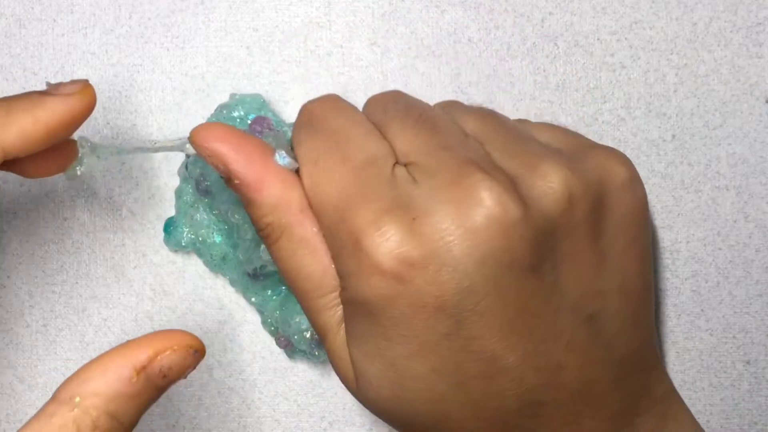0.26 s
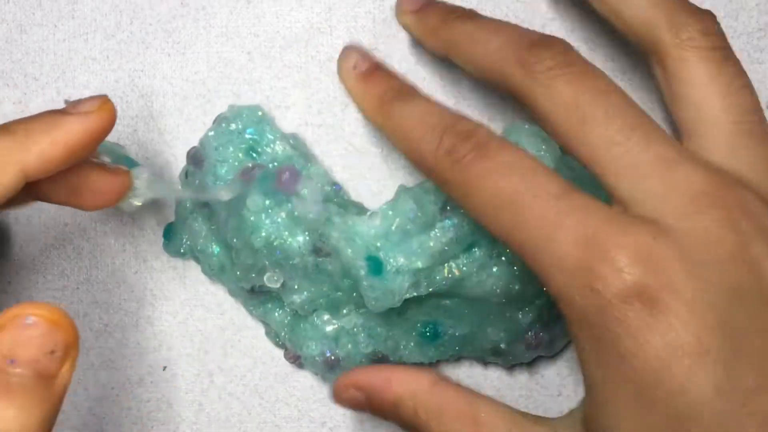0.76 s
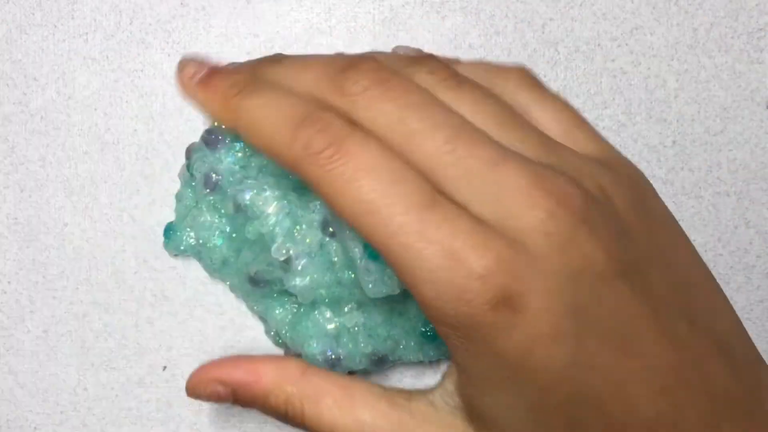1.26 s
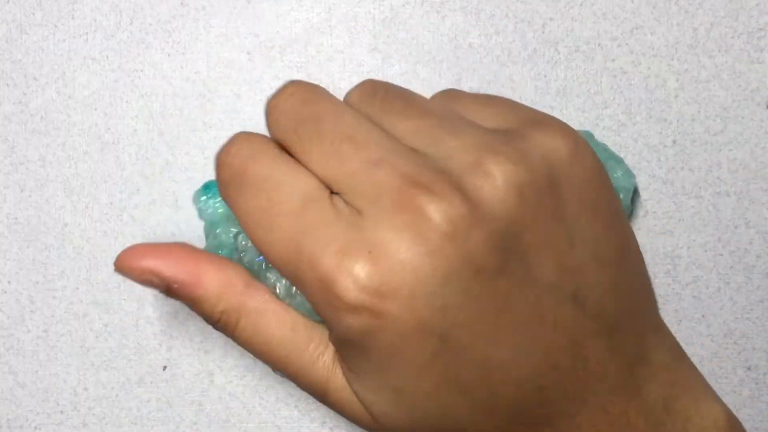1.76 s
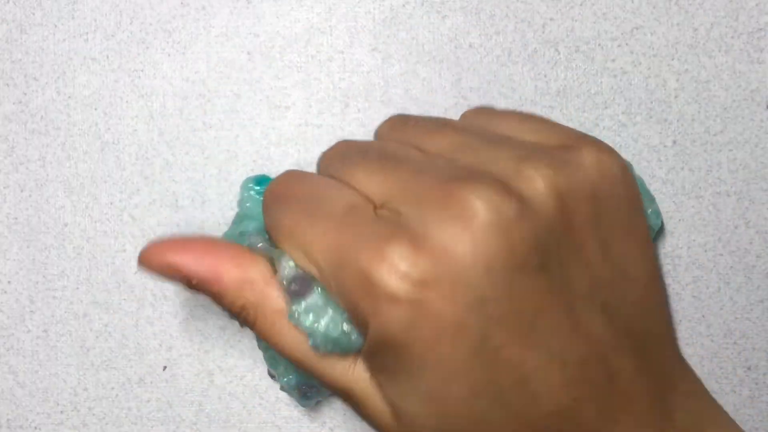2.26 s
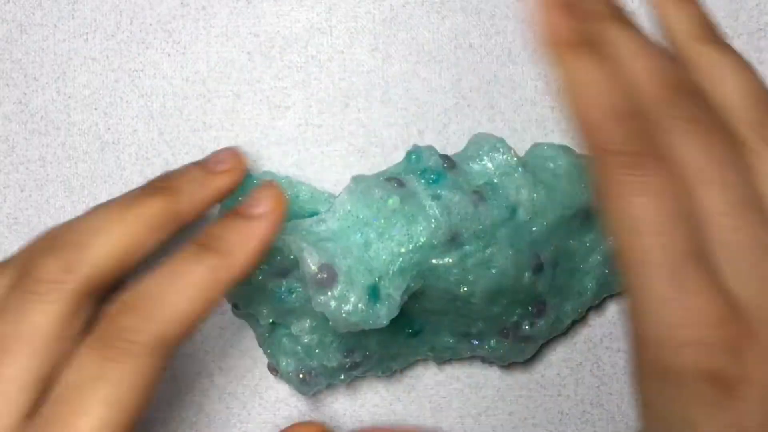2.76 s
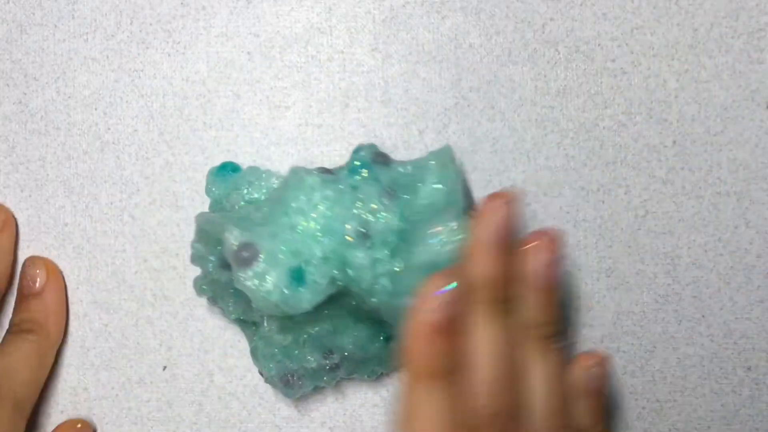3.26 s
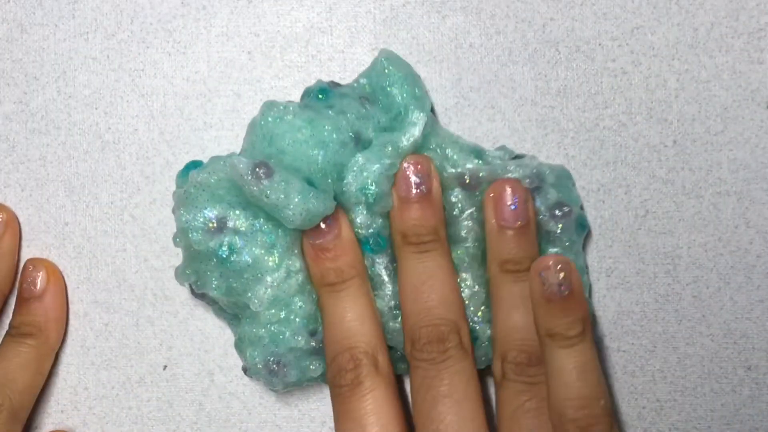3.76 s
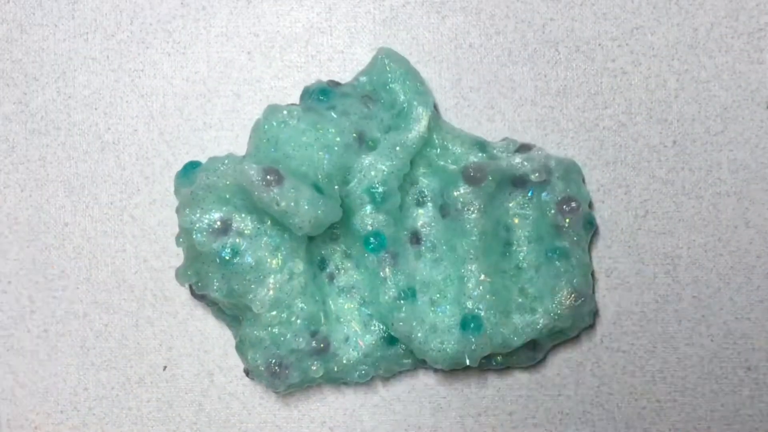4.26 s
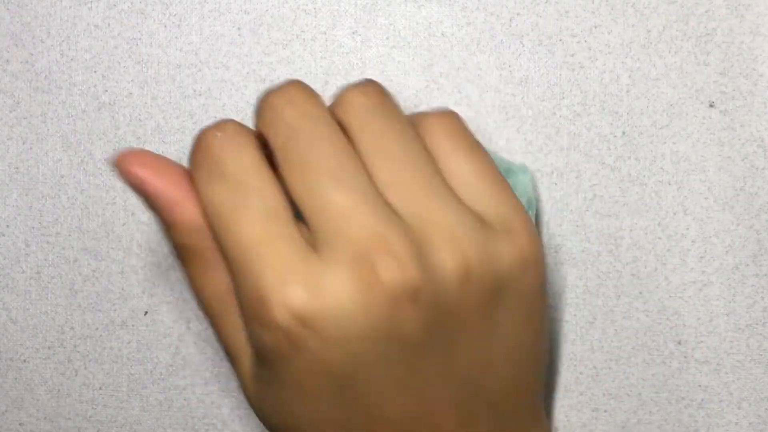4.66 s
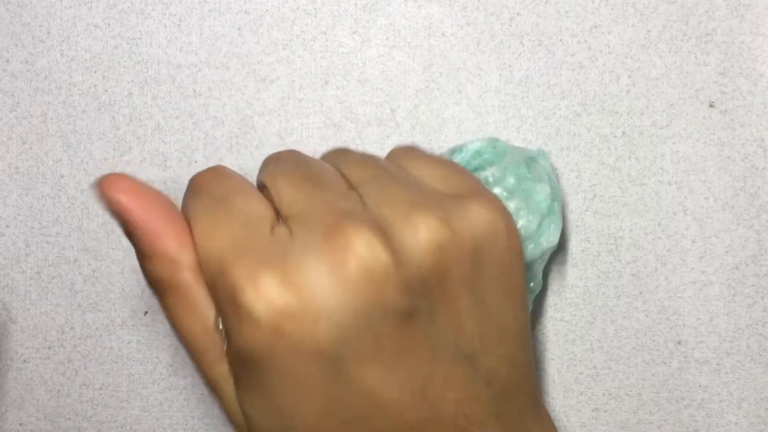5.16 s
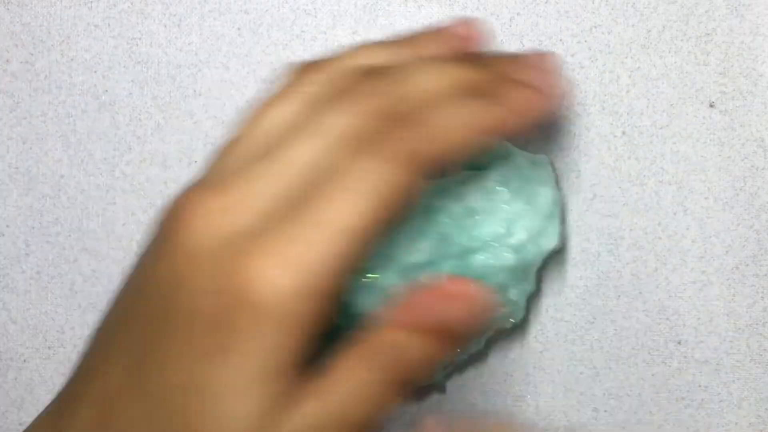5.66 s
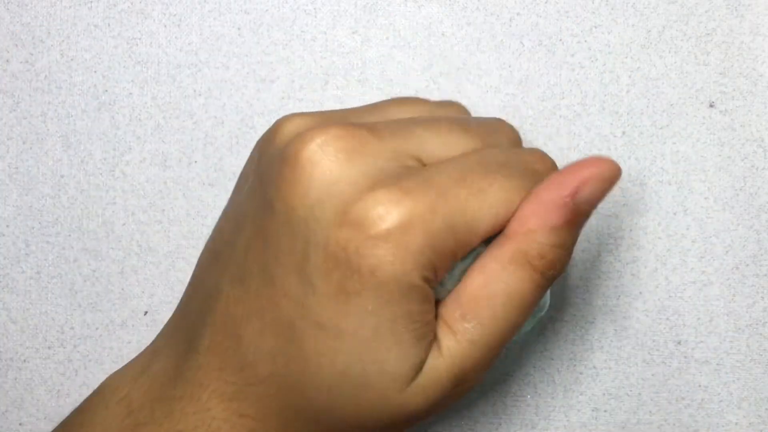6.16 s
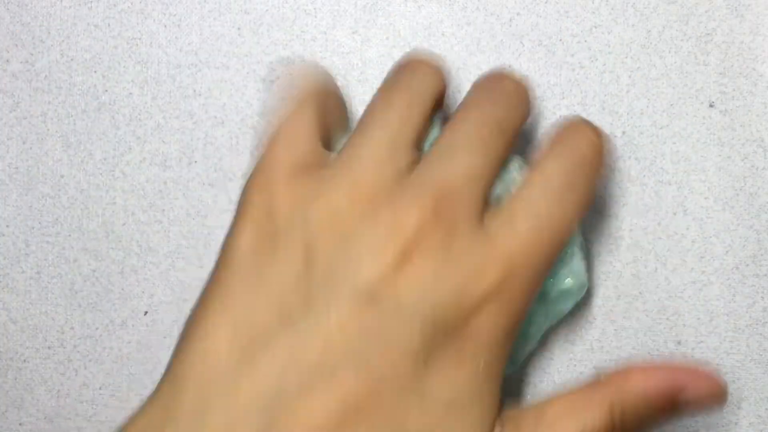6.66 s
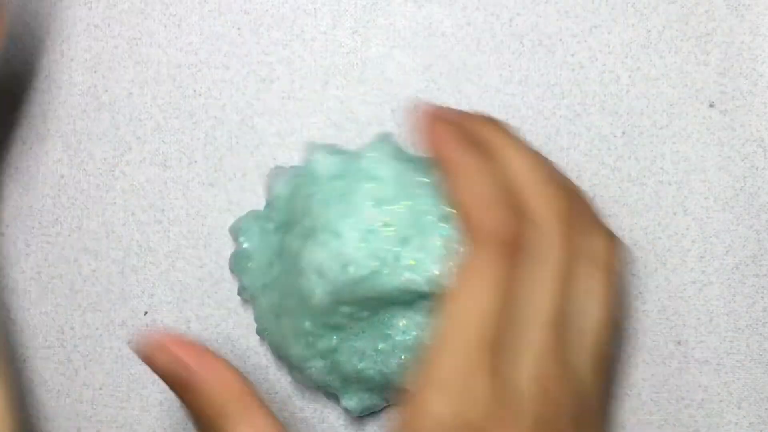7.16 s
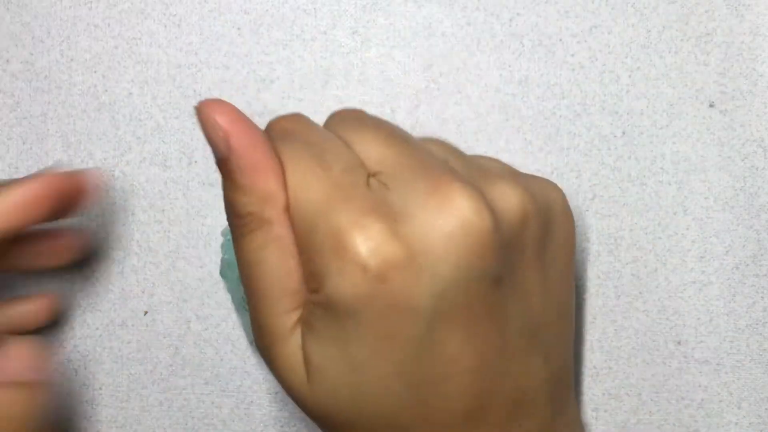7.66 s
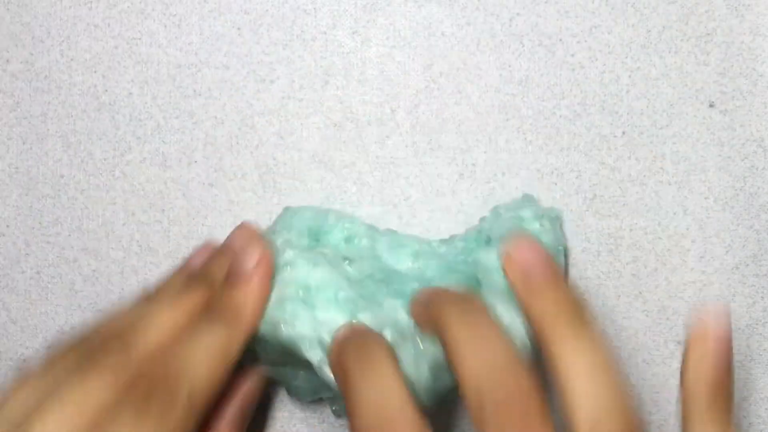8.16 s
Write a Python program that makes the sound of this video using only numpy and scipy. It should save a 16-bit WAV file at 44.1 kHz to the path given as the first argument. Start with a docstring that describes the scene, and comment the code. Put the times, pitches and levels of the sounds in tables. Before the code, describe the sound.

Hands knead and squeeze sticky slime on a table, with sharp air pops, wet crackling, squelches and soft thuds up close.

```python
"""Air pockets pop sharply in slime as a hand kneads it on a table, close to a small microphone.
Each pop is a tearing film that rings its pocket; some blow a puff of air at the microphone.
The sticky mass fizzes and squelches with every squeeze and peel, and glugs as suction lets go.
Underneath, the table thuds and rumbles with the handling, over the faint air of a quiet room."""
import sys
import numpy as np
from scipy import signal
from scipy.fft import rfft, irfft
from scipy.io import wavfile
from scipy.ndimage import uniform_filter1d

SR = 44100
rng = np.random.default_rng(int(sys.argv[2]) if len(sys.argv) > 2 else 0)


def wrap_up_sound(samples):
    """Save the sound to the file named by the first command line argument, as 16-bit audio."""
    columns = np.atleast_2d(samples).T
    # keep every value between -1 and 1, then stretch to whole-number steps
    tamed = np.clip(columns, -1, 1)
    steps = np.round(tamed * 32767).astype(np.int16)
    wavfile.write(sys.argv[1], SR, steps)


N = 370440

# Featured air pockets bursting: t/s, ring level/dB, ring f/Hz, spit level/dB, slap level/dB, t60/s
POPS = [(0.0548, -15.5, 5900, -21.5, -75, 0.014), (.1, -31, 5530, -30, -60, 0.011),
        (.1211, -26.5, 2880, -43, -58, 0.016), (0.134, -23, 5800, -13, -59, 0.01),
        (0.1477, -12, 4960, -40, -66, .014), (0.1473, -15.5, 5160, -37.5, -63, .011),
        (0.159, -35, 4870, -50, -62, 0.023), (0.1671, -25.5, 2280, -47, -41, 0.022),
        (.1945, -30, 6720, -40, -52, 0.013), (0.2234, -29.5, 5340, -33, -55, 0.02),
        (.2291, -38, 2500, -37, -55, .012), (0.2354, -29.5, 2230, -48, -53, 0.015),
        (.2666, -36, 7920, -15.5, -47, 0.0096), (.276, -27.5, 6160, -23, -37, 0.011),
        (.337, -41, 5300, -39.5, -67, .006), (.351, -48, 7800, -29.5, -70, .009),
        (.3557, -36, 5170, -36, -72, 0.0066), (.3832, -55, 4870, -43.5, -71.5, .017),
        (.3915, -48.5, 2420, -45.5, -63, .018), (0.397, -39, 5680, -46, -72.5, 0.0062),
        (0.4097, -51, 7840, -35.5, -51, 0.01), (.453, -31, 2370, -22.5, -36, 0.0065),
        (0.4675, -28.5, 4120, -24.5, -34, 0.012), (.547, -44.5, 6230, -46, -57, 0.028),
        (.581, -45, 3720, -44, -66, 0.016), (.621, -34.5, 2340, -50, -59, 0.034),
        (.641, -34, 3880, -50, -61, 0.019), (0.718, -37.5, 4690, -43, -45.5, 0.029),
        (0.8088, -45, 3550, -43.5, -65, 0.019), (.934, -61, 3610, -71, -72.5, .016),
        (1.052, -59, 8300, -49, -87, 0.0062), (1.0882, -62, 4130, -59, -85, 0.018),
        (1.117, -55.5, 6240, -50.5, -81.5, .016), (1.175, -62, 7100, -50.5, -80.5, 0.0098),
        (1.2304, -44, 6120, -40, -65, 0.028), (1.243, -35, 8500, -60, -62, 0.013),
        (1.263, -49, 3120, -67, -45, .019), (1.4904, -48, 2400, -68, -42, .011),
        (1.547, -38.5, 5800, -41, -53.5, .018), (1.693, -50, 2220, -45, -66, 0.016),
        (1.7138, -47, 6450, -53, -62, 0.017), (1.724, -45, 5080, -53, -48, 0.0082),
        (1.7397, -42, 5240, -46, -57, .008), (1.7549, -44.5, 5140, -45, -73, .007),
        (1.773, -49, 3750, -44, -75, 0.024), (1.801, -38, 2240, -37, -52, 0.016),
        (1.811, -39, 4010, -38, -66, 0.014), (1.8356, -28, 4100, -32, -59, 0.0063),
        (1.8386, -29, 5370, -36, -59, 0.0062), (1.847, -41, 6590, -49, -70, 0.0095),
        (1.868, -44.5, 6400, -43, -77, 0.018), (1.9224, -60, 4910, -46, -84, 0.0047),
        (1.937, -41, 5100, -40, -66, 0.014), (1.974, -45, 5640, -41, -69, 0.0061),
        (1.9935, -47, 5770, -53, -76, 0.01), (2.01, -55, 2490, -48, -61, .02),
        (2.0195, -57, 5770, -46, -74, 0.0037), (2.0376, -46.5, 2370, -49, -56.5, 0.019),
        (2.053, -42, 2400, -56, -70, 0.011), (2.079, -51, 2300, -50, -64, .02),
        (2.0857, -43, 5160, -44, -69, 0.0045), (2.1646, -32.5, 6540, -33.5, -50, 0.017),
        (2.2883, -37.5, 5040, -60, -58, 0.014), (2.3554, -38, 2200, -60, -59, 0.041),
        (2.3617, -34.5, 3480, -55, -62, 0.017), (2.4343, -46, 3620, -34.5, -39, .011),
        (2.456, -34, 6440, -54, -65, 0.024), (2.4608, -38.5, 5470, -43, -52, .02),
        (2.4687, -39, 5340, -55, -61, 0.022), (2.5274, -41.5, 4480, -35, -47, 0.014),
        (2.5925, -27, 1873, -38.5, -52, .015), (3.158, -48, 4260, -39, -54, 0.017),
        (3.2467, -39, 4650, -35, -78, 0.0098), (3.2617, -47, 4480, -47, -75, 0.016),
        (3.2984, -53, 5300, -51, -82, 0.0052), (3.34, -54, 3330, -58, -66.5, 0.013),
        (3.394, -52, 3620, -67, -93, 0.0095), (3.42, -52, 5210, -47, -63, 0.012),
        (3.477, -46, 2200, -34.5, -45, 0.012), (3.512, -66, 9040, -53, -83, .017),
        (3.532, -54, 6800, -53.5, -77.5, 0.014), (3.5607, -58, 5900, -48, -66.5, 0.01),
        (3.5785, -64, 7200, -56.5, -86, 0.013), (3.6028, -60, 2360, -59.5, -70, .014),
        (3.6608, -64.5, 6590, -61.5, -79, 0.01), (3.705, -55, 6440, -45.5, -82.5, 0.011),
        (3.721, -65.5, 6400, -55.5, -88, .014), (3.7311, -57.5, 2200, -57, -65, 0.016),
        (3.8031, -45.5, 5250, -40, -60.5, 0.014), (3.9474, -53, 6120, -65, -82, 0.01),
        (4.0485, -60, 9300, -35, -61.5, 0.016), (4.0541, -25, 7370, -56.5, -44, 0.014),
        (4.0683, -24, 6220, -51, -61, 0.0076), (4.073, -37, 4000, -40, -40, 0.02),
        (4.084, -40, 4480, -41, -50, 0.017), (4.111, -41, 6370, -45.5, -49.5, 0.017),
        (4.6884, -60.5, 5090, -59, -76, 0.016), (4.7122, -50, 6840, -58.5, -56, 0.024),
        (4.7373, -49.5, 3320, -47, -54, 0.022), (4.77, -43, 2230, -43, -53, 0.013),
        (4.778, -36.5, 4450, -32, -51.5, 0.018), (4.8486, -23, 4900, -22, -65, 0.0068),
        (4.8969, -38.5, 6500, -35, -66, 0.019), (4.9135, -44, 6630, -23, -76.5, 0.0055),
        (4.9189, -35, 3530, -32, -44, 0.012), (4.947, -31.5, 2960, -29, -37, 0.014),
        (4.9682, -37.5, 6420, -37, -66.5, 0.02), (4.9955, -38, 8400, -38, -67, 0.041),
        (5.0145, -22, 6030, -16, -43, 0.0065), (5.0152, -27, 6000, -25.5, -35, 0.0051),
        (5.0163, -7, 8400, -21, -20.5, 0.011), (5.061, -22.5, 5400, -15.5, -55, .011),
        (5.0857, -31, 6400, -21.5, -62, 0.018), (5.111, -24.5, 6500, -14, -39, 0.022),
        (5.1132, -12.5, 6600, -15, -48, 0.011), (5.1988, -46, 6330, -42, -75, 0.018),
        (5.253, -49, 6500, -41, -73, 0.022), (5.2624, -37, 8340, -49.5, -68, 0.027),
        (5.3412, -36.5, 3870, -49, -39, 0.045), (5.3757, -38.5, 5640, -44, -40.5, 0.028),
        (5.4806, -46.5, 6010, -43.5, -60, 0.013), (5.867, -47.5, 4480, -73, -61, 0.0095),
        (5.9433, -50.5, 6900, -57.5, -45.5, 0.024), (5.9651, -52, 2280, -42, -50, 0.0086),
        (5.9884, -47, 5630, -44, -66, .015), (5.9952, -50, 4780, -37.5, -72, .009),
        (6.0416, -41.5, 4350, -33, -62, 0.013), (6.096, -31, 5850, -31.5, -50, 0.013),
        (6.137, -21.5, 3300, -16.5, -39, 0.012), (6.1695, -30, 8700, -23.5, -49, .01),
        (6.1923, -32, 8800, -32, -39, 0.0097), (6.2226, -42, 4540, -38, -36, 0.011),
        (6.2287, -51, 8740, -30.5, -67, 0.011), (6.248, -41, 9040, -28.5, -67, 0.0068),
        (6.2537, -38, 8180, -43, -55, .018), (6.2628, -54, 4340, -41.5, -55.5, 0.013),
        (6.2678, -53, 8480, -34, -64, 0.0074), (6.2804, -32.5, 8480, -38, -43, 0.0077),
        (6.315, -22, 5300, -33, -51, 0.0083), (6.3338, -24.5, 7240, -19.5, -52, 0.0053),
        (6.337, -33, 4650, -25, -60, 0.012), (6.3634, -32.5, 6160, -39, -38.5, 0.012),
        (6.381, -47, 7580, -26, -65, 0.0047), (6.396, -36, 5680, -34, -61, .009),
        (6.4257, -49, 8440, -30.5, -61, 0.0083), (6.4369, -31, 6850, -21.5, -60, 0.0068),
        (6.4544, -48, 5990, -34.5, -67, 0.013), (6.4693, -55, 8400, -36, -77, 0.008),
        (6.483, -45, 3920, -42, -46, 0.024), (6.5043, -53, 4220, -43, -72, .012),
        (6.5171, -47.5, 6890, -47.5, -75.5, 0.022), (6.8999, -51.5, 5030, -49, -61, .01),
        (7.2174, -64.5, 2203, -56.5, -71, 0.0082), (7.3722, -58, 7540, -59, -68, 0.019),
        (7.405, -41, 3060, -40.5, -56, 0.011), (7.425, -37, 6700, -35, -66, 0.0081),
        (7.4532, -46, 4010, -45, -49, 0.01), (7.474, -41, 6740, -54, -62, 0.015),
        (7.48, -32.5, 5100, -53, -36.5, 0.019), (7.5135, -12, 4360, -54, -55, 0.011),
        (7.514, -28, 4230, -26, -55, 0.0095), (7.525, -36, 3630, -55, -61, .015),
        (7.5388, -37.5, 3970, -58, -52, 0.03), (7.5982, -56, 2540, -51, -42, 0.014),
        (7.6297, -56, 5770, -51, -70, 0.015), (7.643, -44, 4970, -34, -56, 0.011),
        (7.654, -40.5, 6720, -43.5, -65, 0.028), (7.6805, -16, 3670, -25, -42, 0.0097),
        (7.732, -44, 4690, -41, -46, 0.032), (7.7511, -9, 3070, -15, -39, 0.0056),
        (7.7537, -20, 7950, -32, -59, 0.01), (7.7834, -20.5, 8050, -25, -59, 0.014),
        (7.7856, -30.5, 4780, -27, -32, 0.014), (7.8108, -46, 4410, -36, -51, 0.018),
        (8.011, -52, 2905, -45, -51, 0.021), (8.1356, -55, 4350, -44.5, -64, 0.026),
        (8.146, -53.5, 4310, -43, -74, 0.022), (8.3612, -38, 5900, -33.5, -66, 0.0048)]
# Puffs of air hitting the microphone: t/s, strength/dB, rise/ms, pull/share of the push
PUFFS = [(0.1336, -13, 1, 0.11), (0.267, -7, 0.39, 0.11), (0.277, -3, 0.76, 0.096),
         (0.4106, -16.5, 0.67, 0.045), (0.454, 3, 0.68, 0.094), (0.4679, 4, 0.64, 0.053),
         (5.0171, -20, 0.78, 0.041), (5.0616, -17, 0.9, 0), (5.1119, -4, 0.83, 0),
         (6.336, -11, 0.69, 0.071), (6.437, -18, 0.75, 0.07), (7.5149, -16, 0.37, 0.048),
         (7.7543, 7.5, 0.89, 0.77), (7.7851, -9, 0.58, 0.0071)]
# Slow squeezes: t/s, rise/s, hold/s, fall/s, fizz level/dB, squelch level/dB, tick level/dB
SQUEEZES = [(-.1, .12, .5, .1, -61, -68, -53.5), (1.0, 0.23, 0.52, 0.12, -72.5, -69.5, -65),
            (1.3, 0.356, 0.584, 0.16, -64, -68, -54), (3.1, 0.1054, 0.427, 0.947, -75.5, -74.5, -61),
            (4.5, 0.44, .25, 0.14, -57, -67, -55), (5.75, 0.297, 0.335, 0.23, -60.5, -58.5, -54),
            (7.2, 0.23, 0.45, 0.28, -65, -65.5, -61)]
# The hand peeling off or landing: t/s, rise/s, hold/s, fall/s, fizz/dB, squelch/dB, rumble/dB
PEELS = [(.53, 0.098, .18, 0.032, -45, -46.5, -57.5), (1.2, 0.043, 0.018, .03, -50, -45.5, -51),
         (1.41, 0.073, 0.11, 0.04, -72, -47, -47.5), (2.29, 0.093, .14, 0.043, -44.5, -43, -50),
         (2.52, 0.051, 0.065, 0.046, -52.5, -57.5, -54), (3.02, 0.068, 0.18, 0.068, -62.5, -58, -59.5),
         (4.01, 0.056, 0.063, 0.034, -46, -43.5, -44), (5.25, 0.044, 0.19, 0.038, -44.5, -45.5, -50.5),
         (5.88, 0.074, 0.03, .05, -64, -49.5, -53), (6.58, .09, 0.13, 0.033, -42.5, -39.5, -52),
         (6.88, 0.054, 0.029, .02, -45, -50.5, -58.5), (7.17, 0.073, 0.12, .05, -69.5, -70.5, -72),
         (7.88, 0.079, 0.18, 0.041, -46, -47, -49.5), (8.15, 0.065, 0.073, 0.051, -55.5, -53.5, -52.5)]
# Envelope of each gesture: climb in the rise/dB, sag in the hold/dB, drop in the fall/dB, 40 dB tail/s
SQUEEZE_ENVELOPE = (30, 3.2, 26, .2)
PEEL_ENVELOPE = (26.5, 12, 12, 0.257)
# Suction letting go under the palm: t/s, peak level/dB, cavity f/Hz, length/s
GLUGS = [(0.103, -46, 430, 0.0083), (0.621, -39, 722, 0.033), (0.639, -42, 600, 0.019),
         (1.245, -36, 767, .0076), (1.493, -41.5, 734, 0.013), (1.538, -45.5, 728, .06),
         (2.372, -45.5, 510, .0097), (2.399, -38.5, 540, .0091), (2.436, -37, 840, .015),
         (2.629, -54.5, 1682, 0.037), (3.1, -55, 1360, 0.041), (4.066, -40, 448, 0.026),
         (4.076, -29.5, 614, 0.013), (4.113, -42, 628, 0.063), (4.843, -44.5, 940, 0.0036),
         (4.949, -38.5, 358, 0.0052), (5.289, -40.5, 373, 0.012), (5.321, -30.5, 350.6, 0.0074),
         (5.335, -36.5, 1800, .016), (5.338, -28.5, 324, .014), (5.365, -35.5, 338, .028),
         (5.404, -35, 349.5, 0.017), (5.418, -41, 871, 0.033), (5.946, -41.5, 492, 0.015),
         (6.098, -33, 900, 0.0028), (6.142, -37.5, 323, 0.0062), (6.227, -39.5, 940, .0054),
         (6.319, -41, 910, 0.0045), (6.365, -40, 960, 0.0053), (6.663, -31.5, 374, 0.018),
         (6.679, -24.5, 401, 0.016), (6.68, -27.5, 2100, 0.015), (6.72, -34, 386, 0.058),
         (6.744, -36.5, 807, .052), (6.748, -31.5, 1150, .023), (6.797, -44, 1271, 0.036),
         (6.902, -45, 887, .005), (6.935, -37, 866, 0.036), (7.478, -54, 990, .0042),
         (7.683, -43, 390, 0.0056), (7.751, -36.5, 347, 0.024), (7.942, -45.5, 316, 0.032),
         (7.981, -37.5, 350, 0.052), (8.043, -41, 747, .051), (8.101, -43.5, 885, .015),
         (8.134, -42, 895, 0.018), (8.192, -42.5, 800, 0.02), (8.221, -38, 345, 0.0062),
         (8.363, -42, 846, 0.0029)]
# Fingers and slime bumping the table: t/s, level/dB, upper mode/share
THUDS = [(0.641, -40, 0.36), (0.696, -43, 0.16), (0.781, -43.5, 0.15), (1.253, -33, 0.47),
         (1.499, -42, 0.74), (2.387, -36, 0.46), (2.468, -47, 0), (2.598, -31.5, 0.55),
         (2.943, -39.5, 0.52), (3.083, -46.5, 0.9), (3.221, -38.5, 0.41), (4.064, -30.5, 0.45),
         (4.127, -33.5, 0.54), (5.443, -40.5, 0.8), (5.866, -35, 0.86), (6.721, -34.5, 0.48),
         (6.79, -41.5, 0.5), (8.218, -41, 0.5)]
# Low modes of the table top: f/Hz, t60/s
TABLE_MODES = [(68, 0.13), (130, 0.089)]
# EQ curves of the four noise layers: f/Hz, relative level/dB
FIZZ_EQ = [(1500, -29.5), (2300, -4), (3300, -5.5), (5000, -2.5), (7700, -6.5), (14500, -6), (16000, -10),
           (16500, -32)]
SQUELCH_EQ = [(150, -31.5), (250, 1.5), (500, -2.5), (900, -4), (1600, -10), (2200, -5), (2900, -19.5),
              (6000, -33)]
RUMBLE_EQ = [(30, -8), (60, -6.5), (120, 2.5), (200, -5), (300, -22), (500, -54)]
ROOM_EQ = [(24, -29), (40, -2), (134, 0), (168, -14), (367, -11.5), (461, -21.5), (690, -20.5),
           (957, -30.5), (3370, -32.5), (14900, -40.5), (16500, -51)]

FIZZ_COLUMN, SQUELCH_COLUMN, TICK_COLUMN, RUMBLE_COLUMN = 4, 5, 6, 6  # in SQUEEZES and PEELS
WALLS_DB, WALLS_BUILD_S, WALLS_T60_S = -19.5, 0.036, 0.27  # the room's answer to a pop
FLICKER_DB = 2.2  # unevenness of the fizz and squelch across all pitches
FIZZ_FALL_SCALE = 0.6  # the fizz of a peel stops sooner than its squelch


def pop(ring_db, hz, spit_db, slap_db, t60, samples, ragged_db=2.5):
    """The film tears in a short ragged burst that rings the pocket, spits treble and slaps the mass."""
    t, t60 = np.arange(samples) / SR, np.clip(t60, .002, .04)
    tear_noise, wobble, wall_noise = rng.standard_normal((samples, 3)).T
    crack, drizzle = gain_of(-60 * t / t60), 0.13 * gain_of(-60 * t / (4.8 * t60))
    envelope = (1 - np.exp(-t / 0.00032)) * (crack + drizzle)
    tear = envelope * tear_noise * gain_of(ragged_db * unit_rms(uniform_filter1d(wobble, size=16)))
    tear += 2.5 * np.exp(-((t - .0003) / .00003) ** 2)  # the first snap
    tear[48:] += 0.022 * tear[:-48]  # bounce off the table top
    walls = wall_noise * (1 - np.exp(-t / WALLS_BUILD_S)) * gain_of(WALLS_DB - 60 * t / WALLS_T60_S)
    walls *= np.sqrt((tear ** 2).sum() / 100)  # the room returns a share of the tear's energy
    paths = np.array([tear, walls])
    width_hz = 0.62 * hz * np.sqrt(hz / 5000)  # large, low pockets ring longer
    ring = np.array([resonate(resonate(path, hz, width_hz), hz, 1.5 * width_hz) for path in paths])
    spit = signal.sosfilt(signal.butter(3, [8500, 15500], "band", fs=SR, output="sos"), paths)
    slap = signal.sosfilt(signal.butter(2, [600, 2400], "band", fs=SR, output="sos"), paths)
    layers = ((ring_db, ring), (spit_db, spit), (slap_db, slap))
    blend = sum(gain_of(db) * layer.sum(0) / np.linalg.norm(layer[0]) for db, layer in layers)
    return np.linalg.norm(envelope) * blend


def pops():
    """Every pocket that bursts: the featured pops, then the short ticks."""
    out = np.zeros(N)
    for rows, samples in ((POPS, 6000), (ticks(), 1500)):
        for start, *pocket in rows:
            add(out, start, pop(*pocket, samples))
    return out


def ticks(tries=620, spread_db=4.5, max_boost_db=10):
    """Rows like POPS for small pockets bursting at random while a squeeze or a peel lasts."""
    peeling = gain_of(1) * peel_gain(FIZZ_COLUMN, FIZZ_FALL_SCALE)
    hand_db = 20 * np.log10(np.hypot(squeeze_gain(TICK_COLUMN), peeling))
    when, softness, pitch, spit, slap, decay = rng.random((tries, 6)).T
    boost_db = np.minimum(-spread_db * (1 + np.log(softness + 1e-3)), max_boost_db)
    db = hand_db[(when * N).astype(int)] + boost_db
    spit_db = db + 2.5 + 16 * (spit - .5)
    slap_db = db - 15.5 + 14 * (slap - .5)
    rows = np.transpose([when * N / SR, db, 2300 * 3.8 ** pitch, spit_db, slap_db, 0.008 * (.5 + decay)])
    return list(rows[db > -80])


def puffs(pull_lead_s=.002):
    """A smooth push of air on the diaphragm, most often with a pull just before it."""
    out = np.zeros(N)
    t_ms = np.arange(2000) / SR * 1000
    for start, db, rise_ms, pull in PUFFS:
        push = gain_of(db) * t_ms / rise_ms * np.exp(-t_ms / rise_ms)
        add(out, start, -push)
        add(out, start - pull_lead_s, pull * push)
    return out


def fizz(snaps_per_s=150, snap_decay_s=0.0022):
    """Countless tiny threads of slime snap: a hiss with small crackles, each with its own colour."""
    hiss = equalise(patchy_noise() * flicker(0.0068, FLICKER_DB), FIZZ_EQ)
    snaps = gain_of(1.3 * np.minimum(rng.exponential(1, N), 4)) * (rng.random(N) < snaps_per_s / SR)
    snap_envelope = signal.lfilter([1], [1, -np.exp(-1 / (snap_decay_s * SR))], snaps)
    grains = snap_envelope * rng.standard_normal(N)
    pitch_hz = 5000 * 2 ** (0.5 * wander(samples=400))
    crackle = unit_rms(resonate(grains, np.minimum(pitch_hz, 15000), width_hz=2200))
    hand = np.hypot(squeeze_gain(FIZZ_COLUMN), peel_gain(FIZZ_COLUMN, FIZZ_FALL_SCALE))
    return np.hypot(hand, torn_film_gain()) * (hiss + .45 * crackle)


def torn_film_gain(send_db=-29, t60=0.19):
    """The torn film goes on fizzing: a decaying envelope after each featured pop."""
    kicks = np.zeros(N)
    for start, ring_db, _, spit_db, *_ in POPS:
        kicks[round(start * SR)] += gain_of(ring_db + send_db) ** 2 + gain_of(spit_db + send_db) ** 2
    return np.sqrt(signal.lfilter([1], [1, -gain_of(-120 / (t60 * SR))], kicks))


def squelch():
    """The wet mass tears off skin and table in uneven slips."""
    hand = np.hypot(squeeze_gain(SQUELCH_COLUMN), peel_gain(SQUELCH_COLUMN))
    return hand * equalise(patchy_noise() * flicker(0.017, FLICKER_DB), SQUELCH_EQ)


def glugs():
    """Rushing air rings a cavity and its octave roughly; small, high cavities ring more loosely."""
    out, t = np.zeros(N), np.arange(-2000, 2000) / SR
    for centre, db, hz, length in GLUGS + small_glugs():
        rush = rng.standard_normal(len(t))
        width_hz = 0.14 * hz * hz / 400
        cavity = resonate(resonate(rush, hz, width_hz), hz, width_hz)
        octave = 0.21 * resonate(rush, 2 * hz, width_hz)
        swell = np.exp(-(t / (0.59 * length)) ** 2)
        glug = (cavity + octave) * swell
        add(out, centre + t[0], gain_of(db) * glug / abs(glug).max())
    return out


def small_glugs(tries=120):
    """Rows like GLUGS for the lesser suctions scattered through the peels, riding the squelch level."""
    when, softness, pitch, length = rng.random((tries, 4)).T
    squelch_db = 20 * np.log10(peel_gain(SQUELCH_COLUMN))
    db = squelch_db[(when * N).astype(int)] + 1 - 8 * softness
    rows = np.transpose([when * N / SR, db, 330 * 3.5 ** pitch, .006 * 6.5 ** length])
    return list(rows[db > -75])


def table_thuds(attack_s=0.0082):
    """A soft bump rings the two low modes of the table top."""
    out, t = np.zeros(N), np.arange(8000) / SR
    low, high = (np.sin(2 * np.pi * hz * t) * gain_of(-60 * t / t60) for hz, t60 in TABLE_MODES)
    attack = 1 - np.exp(-t / attack_s)
    for start, db, share in THUDS:
        add(out, start, 2 * gain_of(db) * attack * ((1 - share) * low + share * high))
    return out


def table_rumble(rest_db=-68):
    """The table carries the handling as a lumpy low noise that fades more slowly than the slime."""
    level = np.hypot(gain_of(rest_db), peel_gain(RUMBLE_COLUMN, fall_scale=5.1))
    return level * equalise(rng.standard_normal(N) * flicker(0.033, depth_db=3.5), RUMBLE_EQ)


def room_tone(level_db=-64.5):
    """The air of a quiet room: a steady, dark noise bed."""
    return gain_of(level_db) * equalise(rng.standard_normal(N), ROOM_EQ)


def squeeze_gain(column):
    """One layer's gain under the squeezes, which swell and hold nearly level."""
    return gesture_gain(SQUEEZES, SQUEEZE_ENVELOPE, column)


def peel_gain(column, fall_scale=1):
    """One layer's gain under the peels, which sag more and break off."""
    return gesture_gain(PEELS, PEEL_ENVELOPE, column, fall_scale)


def gesture_gain(gestures, envelope, column, fall_scale=1):
    """Each gesture rises, holds, falls and tails off; overlapping ones add in power."""
    t, power = np.arange(N) / SR, 0
    climb_db, sag_db, drop_db, tail_s = envelope
    corner_db = [-3 * climb_db, -climb_db, 0, -sag_db, -sag_db - drop_db, -sag_db - drop_db - 40]
    for gesture in gestures:
        start, rise, hold, fall = gesture[:4]
        corner_s = start + np.cumsum([-rise, rise, rise, hold, fall_scale * fall, tail_s])
        power += gain_of(gesture[column] + np.interp(t, corner_s, corner_db)) ** 2
    return np.sqrt(power)


def patchy_noise(depth_db=3):
    """Uneven peeling: noise that is louder and softer in patches about 700 Hz wide and 20 ms long."""
    spectrum = signal.stft(rng.standard_normal(N), nperseg=256, noverlap=192)[2]
    bands = uniform_filter1d(rng.standard_normal(spectrum.shape), size=4, axis=0)
    patches = unit_rms(uniform_filter1d(bands, size=14, axis=1))
    return signal.istft(spectrum * gain_of(depth_db * patches), nperseg=256, noverlap=192)[1][:N]


def flicker(seconds, depth_db):
    """A gain that wanders at random over about this time."""
    return gain_of(depth_db * wander(int(seconds * SR)))


def wander(samples):
    """A random modulator: smoothed noise at unit rms."""
    return unit_rms(uniform_filter1d(rng.standard_normal(N), samples))


def resonate(x, hz, width_hz):
    """A resonance, fixed or moving: shift hz down to zero, smooth, and shift back."""
    carrier = np.exp(2j * np.pi * np.cumsum(hz * np.ones(len(x))) / SR)
    pole = np.exp(-np.pi * width_hz / SR)
    return 2 * (carrier * signal.lfilter([1 - pole], [1, -pole], x / carrier)).real


def equalise(x, curve):
    """Colour a sound with an EQ curve and bring it to unit rms."""
    hz, db = np.transpose(curve)
    bin_db = np.interp(np.log(np.fft.rfftfreq(len(x), 1 / SR) + 1), np.log(hz + 1), db)
    return unit_rms(irfft(rfft(x) * gain_of(bin_db), len(x)))


def gain_of(db):
    return 10 ** (np.asarray(db) / 20)


def unit_rms(x):
    return x / np.sqrt(np.mean(x ** 2) + 1e-20)


def add(mix, start_s, sound):
    part = mix[round(start_s * SR):][:len(sound)]
    part += sound[:len(part)]


def scene():
    """Slime, table and room in one mono mix."""
    mix = room_tone() + puffs() + table_thuds() + fizz() + squelch() + table_rumble() + glugs() + pops()
    return mix[None]


def record(dry):
    """A steep bass cut and lagging lows turn each puff into a falling chirp; the top is band-limited."""
    bass_cut_hz, lag_hz, top_hz, ceiling = 53, 210, 16600, .9
    dip_at_s, dip_half_width_s, dip_db = 4.386, .014, -25
    x = signal.sosfilt(signal.butter(6, bass_cut_hz, "high", fs=SR, output="sos"), dry)
    warped = np.tan(np.pi * lag_hz / SR)
    allpass = (warped - 1) / (warped + 1)
    x = signal.sosfilt([[allpass, 1, 0, 1, allpass, 0]] * 2, x)  # the lows arrive late
    x = x / (1 + (x / ceiling) ** 12) ** (1 / 12)  # the loudest cracks round off
    dip = np.exp(-((np.arange(N) / SR - dip_at_s) / dip_half_width_s) ** 2)
    x = x * gain_of(dip_db * dip)  # the level dips briefly
    return signal.oaconvolve(x, signal.firwin(255, top_hz, window=("kaiser", 9), fs=SR)[None], "same")


dry = scene()
out = record(dry)
wrap_up_sound(out)
```